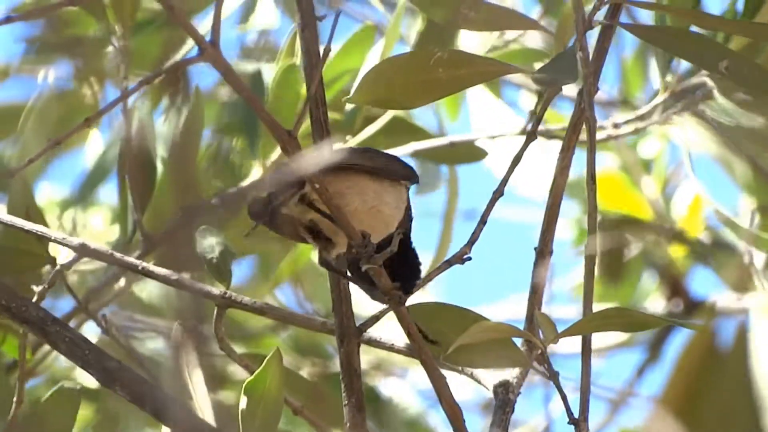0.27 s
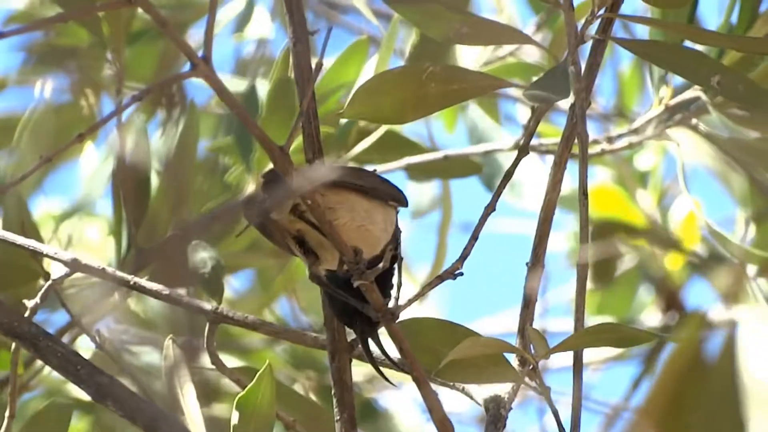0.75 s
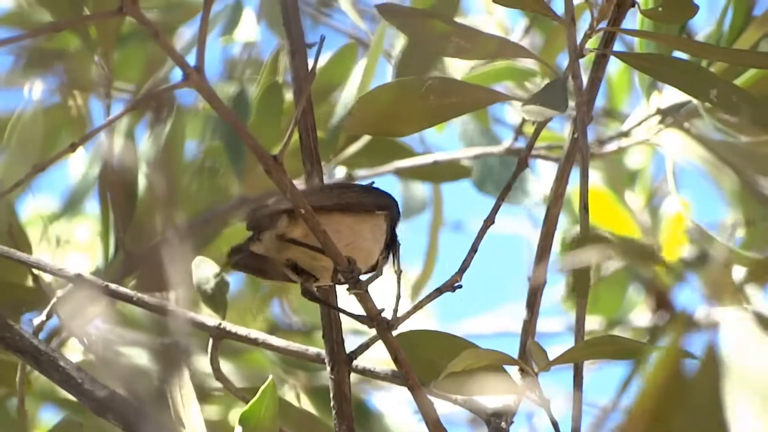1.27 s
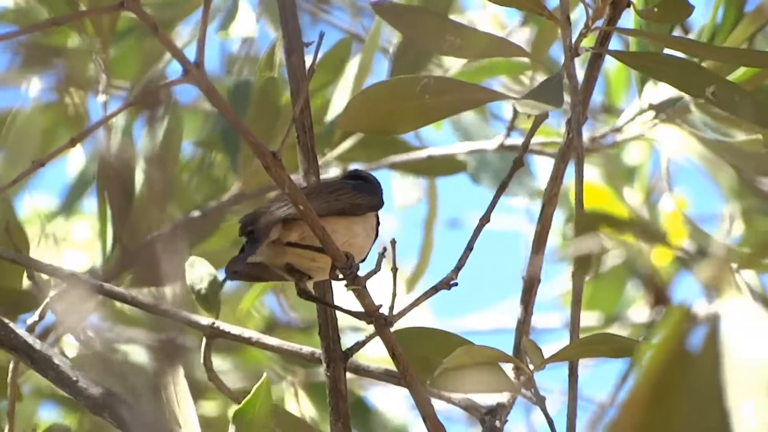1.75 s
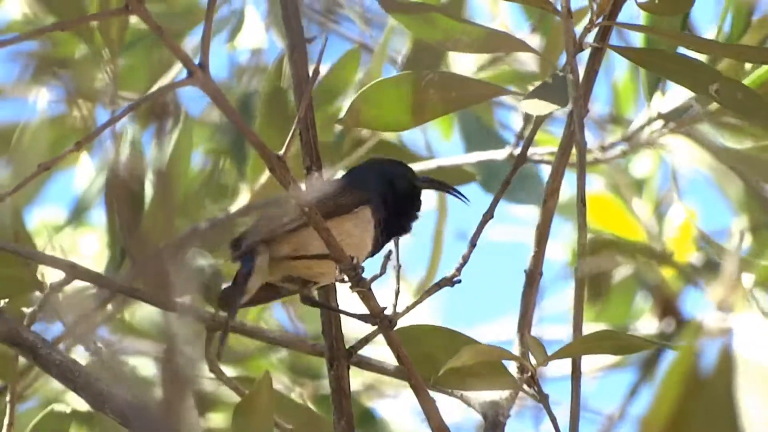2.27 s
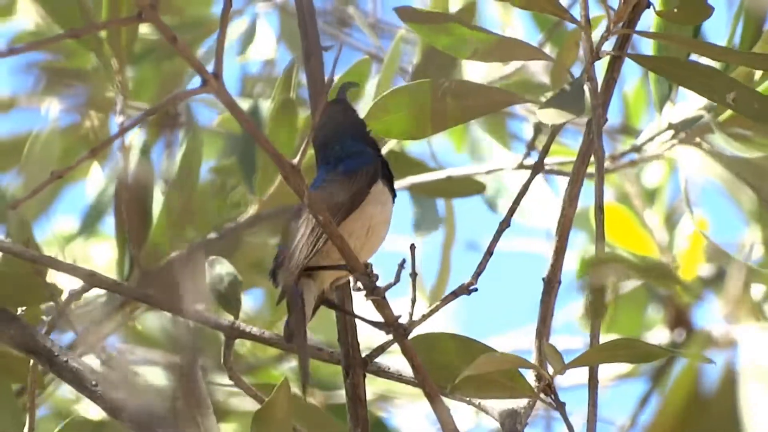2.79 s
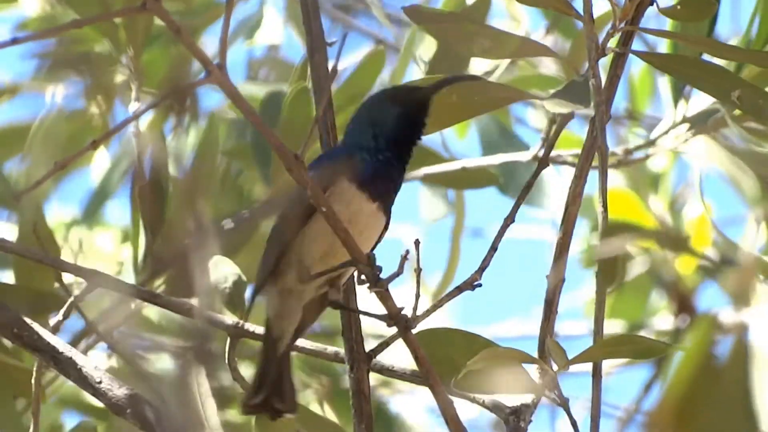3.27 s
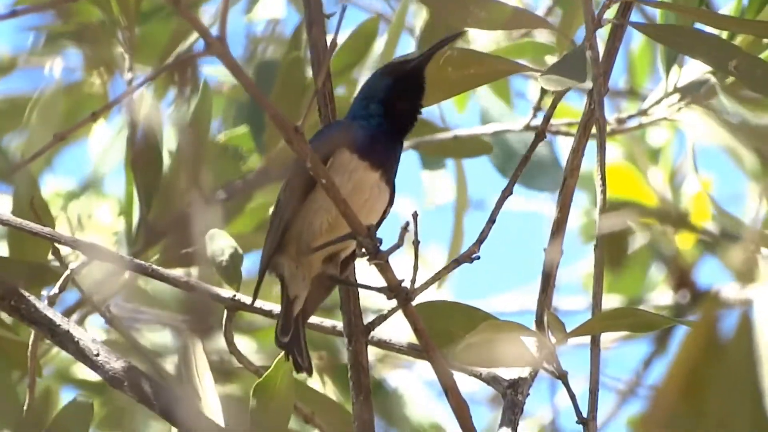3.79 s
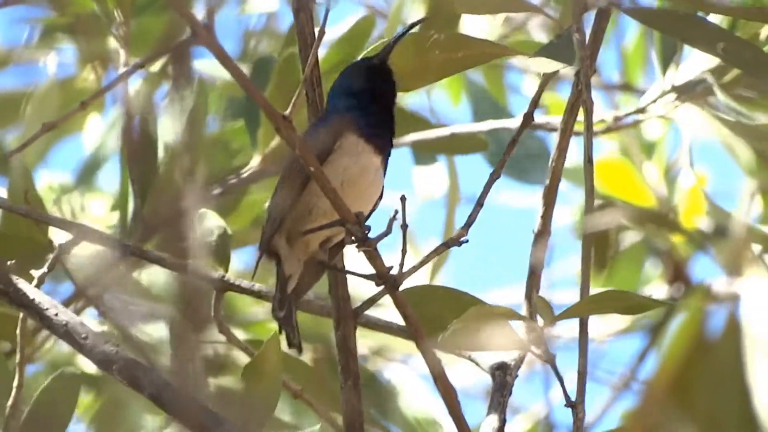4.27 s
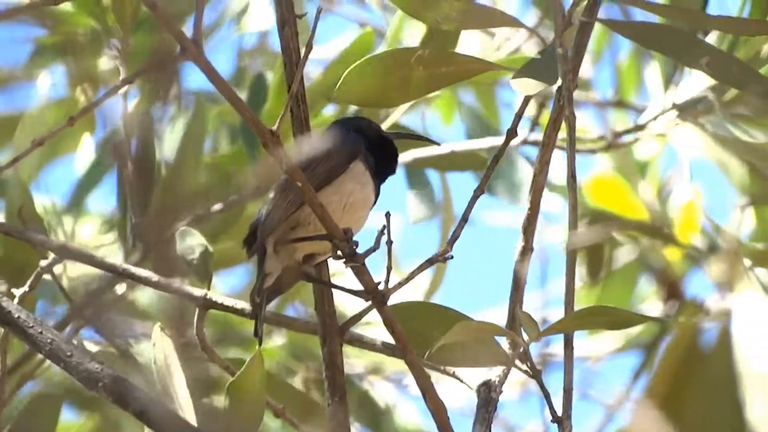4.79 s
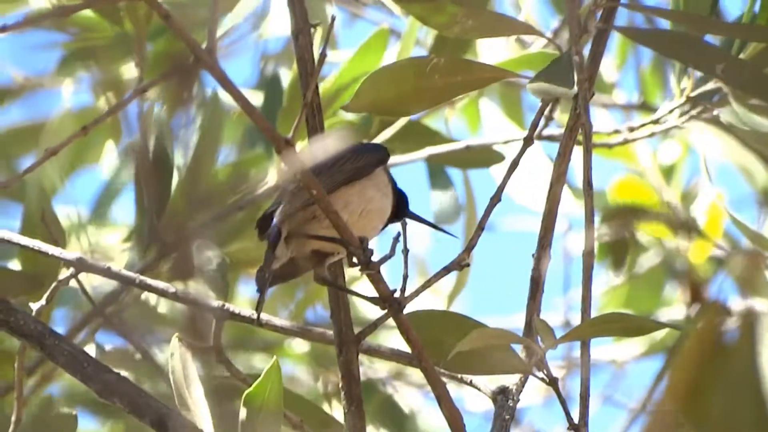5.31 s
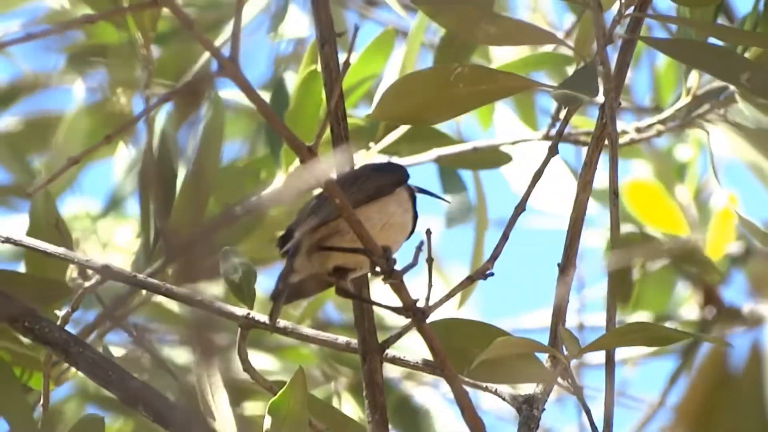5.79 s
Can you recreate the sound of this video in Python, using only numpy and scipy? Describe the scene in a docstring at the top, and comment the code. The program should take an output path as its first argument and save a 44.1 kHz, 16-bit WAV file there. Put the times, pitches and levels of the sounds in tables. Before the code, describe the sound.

Quick, high, scratchy birdsong comes in short bursts outdoors, over a gentle leafy hiss, scattered dry clicks and a faint distant engine hum.

```python
"""A rising wheeze and a scooped tweet open over a soft outdoor rush, then a sunbird twitters on in a leafy tree.
Its syrinx is a pitch-gliding oscillator, roughened for rasp, chopped for buzz, or replaced by noise bands;
foliage adds decaying noise echoes. Dry pips and ticks, short decaying tones with noise clicks, sound close by.
Behind lie shaped noise and a low rumble that swells near 1.4 s and then mixes with the hum of a distant engine,
made of wavering sines."""
import sys
import numpy as np
from scipy import signal
from scipy.fft import rfft, irfft, next_fast_len
from scipy.io import wavfile
from scipy.ndimage import uniform_filter1d, map_coordinates

SR = 44100
rng = np.random.default_rng(int(sys.argv[2]) if len(sys.argv) > 2 else 0)


def dump_mix(stems):
    """Bounce the given channels to the path in sys.argv[1] as a 16-bit WAV at rate SR."""
    frames = np.atleast_2d(stems).T  # one column per channel
    limited = np.clip(frames, -1, 1)  # hard clip at full scale
    pcm = np.round(limited * 32767).astype(np.int16)
    wavfile.write(sys.argv[1], SR, pcm)


N = 266805  # samples
TOP_HZ = 15720  # upper band limit

# Table levels stand before later gains, filters and mixing; spectra are relative, per Hz of bandwidth.
# background air: (time [s], low rush level [dB], rush level [dB], hiss level [dB])
AIR_LEVELS = [(0.0, -60, -51.5, -47), (0.37, -58.5, -47, -53), (1.04, -56.5, -48, -52.5),
              (1.87, -56, -43.5, -49), (2.17, -57.5, -49.5, -52.5), (5.43, -60, -50.5, -56.5),
              (6.05, -61.5, -47.5, -51)]
# spectrum of the low rush: (frequency [Hz], density [dB])
LOW_RUSH_SPECTRUM = [(60, -40), (130, -2), (250, -3.5), (440, 2.5), (800, -6), (1600, -44)]
# spectrum of the main rush: (frequency [Hz], density [dB])
RUSH_SPECTRUM = [(250, -22.5), (600, -3), (1000, 4.5), (1500, 5), (2400, -0.5), (3400, -1.5), (4400, -8),
                 (8800, -46.5), (15500, -56)]
# spectrum of the hiss: (frequency [Hz], density [dB])
HISS_SPECTRUM = [(3000, -16.5), (5000, -5), (8500, -2.5), (10500, -19.5), (15500, -27.5)]
# left-right likeness of the background noise: (frequency [Hz], correlation [0-1])
STEREO_LIKENESS = [(60, .99), (150, 0.82), (500, 0.65), (1200, 0.81), (4000, 0.83), (12000, 0.73)]
# rumble: (time [s], level [dB])
RUMBLE_LEVELS = [(0.0, -68), (0.03, -77), (1.13, -70), (1.43, -46), (1.79, -61.5), (5.54, -61.5),
                 (5.63, -58), (6.05, -55)]
# spectrum of the rumble noise: (frequency [Hz], density [dB])
RUMBLE_SPECTRUM = [(15, -20.5), (30, -3), (60, 0), (95, 2), (135, -11), (250, -25.5), (600, -85)]
# engine lines: (frequency [Hz], level [dB])
ENGINE_LINES = [(47, -1.5), (64, 1.5), (80, -9), (95, -0.5)]

# rising wheezes that lead into a tweet or a chup: (time [s], length [s], middle pitch [Hz], level [dB])
WHEEZES = [(-.01, 0.034, 4570, -31.5), (3.85, 0.015, 4830, -40.5), (4.064, 0.0168, 4600, -43),
           (5.692, .056, 4900, -34), (5.919, 0.047, 4780, -35.5)]
WHEEZE_GLIDE, WHEEZE_RASP, WHEEZE_RICHNESS = 0.48, 0.362, 0.14  # octaves, 0-1, 0-1
WIDE_SPACING_HZ = 2460  # between the partials of wheezes and chups
# low nasal notes with strong harmonics: (time [s], length [s], middle pitch [Hz], level [dB])
NASALS = [(0.78, 0.069, 2115, -37), (0.862, 0.07, 2070, -39.5), (5.062, 0.072, 2048, -40.5),
          (5.363, 0.064, 2018, -42.5)]
NASAL_GLIDE, NASAL_RASP, NASAL_RICHNESS = -0.04, 0.06, 0.2  # octaves, 0-1, 0-1
# buzzes, a strong partial flanked by close weaker ones:
# (time [s], length [s], middle pitch [Hz], glide [octaves], level [dB])
BUZZES = [(2.896, 0.047, 3710, -.04, -36), (2.976, 0.038, 3244, -0.08, -39.5),
          (3.057, 0.02, 3655, 0.074, -31.5), (3.289, 0.04, 4090, 0.11, -39.5),
          (3.353, 0.04, 4360, 0.23, -39.5), (4.311, 0.057, 4340, -0.258, -40.5),
          (4.351, 0.067, 4024, -0.098, -36), (5.604, .07, 3975, 0.198, -40.5)]
BUZZ_SPACING_HZ, BUZZ_RASP, BUZZ_RICHNESS = 791, 0.15, 0.44
# chups, which sag onto one pitch: (time [s], length [s], level [dB])
CHUPS = [(3.864, 0.028, -30.5), (4.07, 0.0333, -32.5)]
CHUP_HZ, CHUP_RASP, CHUP_RICHNESS = (4750, 4290, 4350), 0.089, 0.092  # start, middle, end

# tweets scoop up to a pure held tone:
# (time [s], hold [s], held pitch [Hz], held level [dB], scoop level [dB])
TWEETS = [(.026, 0.028, 4342, -16.5, -30.5), (.222, 0.026, 4253, -27, -27),
          (5.743, .03, 4312, -19.5, -36.5), (5.979, 0.025, 4575, -27.5, -33.5)]
SCOOP_S, SCOOP_LEAD_S = 0.017, 0.012
SCOOP_FROM, SCOOP_MIDDLE = 0.73, 0.89  # pitches as shares of the held tone
SCOOP_RASP, PURE_RASP = 0.16, 0.027
# steep upslurs, a husky climb that breaks into a louder top:
# (time [s], climb length [s], top length [s], top level [dB])
UPSLURS = [(.289, 0.035, 0.026, -23.5), (.404, 0.033, 0.024, -25), (.513, .038, 0.0287, -28)]
CLIMB_HZ, TOP_NOTE_HZ = (3103, 4280, 5170), (5710, 6650, 6990)  # start, middle, end
CLIMB_DB, OVERLAP_S = -2.5, 0.0024  # climb relative to top; overlap of the two
CLIMB_RASP, TOP_RASP = 0.28, 0.16
# slurred and level notes, with two fading echoes of tweets:
# (time [s], length [s], middle pitch [Hz], glide [octaves], level [dB])
SLURS = [(.768, 0.026, 2684, -0.41, -39), (.824, .088, 5160, 0.56, -59), (.932, .04, 4330, .2, -47.5),
         (1.104, .026, 2670, .5, -43.5), (1.212, 0.069, 2420, -0.6, -46),
         (2.097, 0.035, 4070, -0.35, -26.5), (2.71, 0.016, 4266, 0.11, -33),
         (2.722, 0.05, 3035, -0.027, -35), (2.822, .024, 3850, -0.59, -32.5),
         (2.851, .02, 3900, 0.22, -36.5), (2.965, 0.022, 4380, .3, -41), (4.684, 0.055, 2848, .12, -34),
         (4.81, 0.045, 3214, -0.19, -38), (4.991, 0.052, 2980, -0.23, -45), (5.132, .01, 2885, -0.105, -34),
         (5.32, 0.038, 3246, 0.74, -41), (5.476, 0.017, 2236, .9, -38.5), (5.793, 0.02, 4295, 0, -32.5),
         (5.85, 0.029, 3790, -.1, -35.5), (5.951, 0.047, 2860, 0.29, -41), (6.018, .04, 4570, 0, -43)]
EARLY_SHARE = 0.56  # share of a glide done by mid-note
STEADY_RASP, RASP_PER_OCTAVE, MOST_RASP = 0.09, 0.48, 0.21  # sliding roughens the tone
# thin, very high whistles: (time [s], length [s], middle pitch [Hz], level [dB])
THIN_WHISTLES = [(1.392, 0.029, 9230, -37.5), (1.481, 0.07, 9760, -37.5), (1.587, .066, 7620, -29),
                 (1.793, .056, 7450, -37), (1.84, 0.022, 7560, -30.5), (1.891, 0.057, 6604, -35.5)]
THIN_GLIDE, THIN_RASP = 0.076, 0.13  # octaves, 0-1
# lower line sung by the other side of the syrinx: (time [s], length [s], level [dB])
UNDERTONES = [(1.601, 0.093, -46), (1.805, .1, -45)]
UNDER_HZ, UNDER_GLIDE = 6180, 0.23  # middle pitch, octaves

# sharp lisps in the harsh notes: (time [s], length [s], level [dB])
LISPS = [(0.153, 0.031, -47), (.286, 0.026, -48), (2.097, 0.033, -48), (2.444, 0.03, -41),
         (3.858, 0.026, -46), (4.34, 0.092, -52.5), (4.685, 0.048, -53), (5.952, 0.053, -47)]
LISP_HZ, LISP_WIDTH_HZ = 7360, 3500
# toneless rasps, wider the higher they lie: (time [s], length [s], centre [Hz], level [dB])
RASPS = [(0.154, 0.043, 6270, -41), (0.161, .07, 3790, -42), (1.278, 0.034, 2620, -42.5),
         (1.281, 0.028, 6350, -47.5), (2.149, 0.083, 3230, -41.5), (2.204, .032, 1012, -40),
         (2.452, 0.035, 5540, -35.5), (3.084, 0.027, 3200, -41), (3.245, 0.039, 3144, -42.5),
         (3.483, 0.022, 3034, -38.5), (4.691, 0.21, 1786, -48)]
RASP_WIDTH = 0.44  # share of the centre
# turbulence in the bird's throat: (frequency [Hz], density [dB])
HUSK_SPECTRUM = [(600, -18), (1500, -13), (3500, 12), (8500, 8.5), (10500, -31), (15000, -25)]

# close pips: (time [s], peak level [dB], nominal pitch [Hz], decay length [s])
PIPS = [(0.63, -27, 2930, 0.0066), (1.214, -23, 2010, 0.0028), (1.4484, -22, 2980, 0.002),
        (1.7948, -25.5, 3430, 0.0035), (2.031, -27.5, 3780, 0.0036), (2.2972, -25, 3270, 0.0051),
        (2.696, -23, 2750, 0.0027), (3.5216, -20, 2830, 0.0035), (3.551, -31, 2670, 0.0051),
        (3.625, -24, 1780, 0.0053), (3.66, -34, 1760, 0.004), (3.701, -26.5, 3610, 0.0057),
        (3.721, -29, 1950, 0.0056), (4.1505, -27, 3530, 0.0031), (4.2263, -31, 1660, 0.0058),
        (4.524, -26.5, 1520, 0.0045), (4.771, -17, 2225, 0.0064), (4.788, -19, 2940, 0.0065),
        (4.8595, -23.5, 3900, 0.0035), (4.875, -20.5, 3100, 0.0034), (5.136, -28.5, 1930, 0.0064),
        (5.1956, -25, 2190, 0.0035)]
PIP_DB, PIP_SETTLES = -3.5, 0.911  # gain; share of the nominal pitch on which a pip ends
# dry high ticks: (time [s], peak level [dB])
TICKS = [(0.979, -35.5), (1.0957, -29.5), (1.491, -33.5), (2.191, -30), (3.0795, -31), (3.1438, -32.5),
         (3.5854, -36), (4.877, -40), (5.3393, -36)]
TICK_S, TICK_HZ, TICK_DB = 0.00063, 7060, 2.5  # decay length, end pitch, gain
# tone colour of the ticks: (frequency [Hz], gain [dB])
TICK_COLOUR = [(1000, -1.5), (8500, 4.5), (11000, -11), (15500, -14)]
# onsets of quick falling chips: (time [s])
CHIP_TIMES = [1.761, 1.877, 1.989, 2.079]
CHIP_S, CHIP_DB = 0.018, -41


def amp(db):
    """Decibel law: 20 dB is a tenfold amplitude ratio."""
    return 10 ** (np.asarray(db) / 20)


def unit(x):
    """Normalisation of effective amplitude: scale to rms 1."""
    return x / np.sqrt(np.mean(np.abs(x) ** 2) + 1e-20)


def along(points, hz):
    """Logarithmic frequency scale: interpolate (Hz, value) points along it."""
    f, v = np.transpose(points)
    return np.interp(np.log(hz + 1), np.log(f + 1), v)


def curves(rows):
    """Piecewise-linear envelopes: one curve for each column after the time."""
    s, *cols = np.transpose(rows)
    return [np.interp(np.arange(N) / SR, s, c) for c in cols]


def wobble(rate, size=N):
    """Band-limited fluctuation: spline through random knots, rate of them a second."""
    knots = rng.standard_normal(int(size * rate / SR) + 4)
    return map_coordinates(knots, [np.arange(size) * rate / SR])


def filtered(x, response):
    """Linear filtering: multiply the spectrum by a response of frequency."""
    m = next_fast_len(N + SR // 2)
    return irfft(rfft(x, m) * response(np.fft.rfftfreq(m, 1 / SR)), m)[..., :N]


def add(track, s, sound):
    """Superposition: sum a sound into the track at time s."""
    start = round(s * SR)
    part = sound[max(-start, 0):max(N - start, 0)]
    track[max(start, 0):][:len(part)] += part


def rush(spectrum, patchy_db):
    """Random noise with patchy gain; mid and side shares set the interchannel correlation."""
    z = signal.stft(rng.standard_normal((2, N)), nperseg=512)[2]
    field = uniform_filter1d(rng.standard_normal(z.shape[1:]), size=5, axis=0)
    field = uniform_filter1d(field, size=8, axis=1)
    pair = signal.istft(z * amp(patchy_db * unit(field)), nperseg=512)[1][:, :N]

    def mid_side_response(hz):
        angle = np.arccos(np.clip(along(STEREO_LIKENESS, hz), -1, 1)) / 2
        return amp(along(spectrum, hz)) * [np.cos(angle), np.sin(angle)]

    mid, side = filtered(pair, mid_side_response)
    return unit(np.array([mid + side, mid - side]))


def air(low_db=1, rush_db=2, hiss_db=-7.5):
    """Broadband noise by bands: a low body, the main rush and a thin hiss, each with its own level curve."""
    low_level, rush_level, hiss_level = curves(AIR_LEVELS)
    hiss = rush(HISS_SPECTRUM, patchy_db=1.5)
    low_rush = rush(LOW_RUSH_SPECTRUM, patchy_db=1.8)
    main_rush = rush(RUSH_SPECTRUM, patchy_db=2.5)
    return (amp(low_level + low_db) * low_rush
            + amp(rush_level + rush_db + wobble(12)) * main_rush
            + amp(hiss_level + hiss_db) * hiss)


def engine_hum():
    """Line spectrum: steady frequencies whose strengths and phases waver."""
    t = np.arange(N) / SR
    lines = np.zeros(N)
    for hz, db in ENGINE_LINES:
        lines += amp(db + 3.2 * wobble(3.1)) * np.sin(2 * np.pi * hz * t + 0.6 * wobble(2.16))
    return unit(lines)


def rumble(noise_db=-1, hum_db=-2):
    """Power-sharing crossfade: low noise partly gives way to the hum of the far engine."""
    level, = curves(RUMBLE_LEVELS)
    hum_share = np.clip(curves([(1.6, 0), (2.2, 0.63)])[0], 0, 1)  # (time [s], power share)
    roar = rush(RUMBLE_SPECTRUM, patchy_db=1)
    noise_part = amp(noise_db) * np.sqrt(1 - hum_share) * roar
    return amp(level) * (noise_part + amp(hum_db) * np.sqrt(hum_share) * engine_hum())


def swell(length, rise=0.22, fall=0.23):
    """Pressure envelope of one note: rise, hold and rounded fall, as shares of its length."""
    u = np.linspace(0, 1, int(length * SR))
    return u, np.sin(np.pi / 2 * np.clip(np.minimum(u / rise, (1 - u) / fall), 0, 1))


def syrinx(length, start_hz, middle_hz, end_hz, rasp, jitter_hz=900, flutter_rate=1100, shimmer_db=9):
    """Frequency-modulated oscillator: phase and strength of an arched glide; rasp shakes both."""
    u, pressure = swell(length)
    hz = np.polyval(np.polyfit([0, 1 / 2, 1], [start_hz, middle_hz, end_hz], 2), u)
    hz = hz + rasp * jitter_hz * wobble(flutter_rate, len(u))
    shimmer = unit(amp(rasp * shimmer_db * wobble(flutter_rate, len(u))))
    return 2 * np.pi * np.cumsum(hz) / SR, np.sqrt(2) * pressure * shimmer


def glide(hz, octaves):
    """Exponential pitch scale: start, middle and end of a slide that slows as it goes."""
    return hz * 2 ** (-EARLY_SHARE * octaves), hz, hz * 2 ** ((1 - EARLY_SHARE) * octaves)


def chopped_notes():
    """Side partials by modulation: time, length, three pitches, level, rasp, spacing, richness of each note."""
    for s, length, hz, db in WHEEZES:
        yield s, length, *glide(hz, WHEEZE_GLIDE), db, WHEEZE_RASP, WIDE_SPACING_HZ, WHEEZE_RICHNESS
    for s, length, hz, db in NASALS:
        yield s, length, *glide(hz, NASAL_GLIDE), db, NASAL_RASP, hz, NASAL_RICHNESS
    for s, length, hz, octaves, db in BUZZES:
        yield s, length, *glide(hz, octaves), db, BUZZ_RASP, BUZZ_SPACING_HZ, BUZZ_RICHNESS
    for s, length, db in CHUPS:
        yield s, length, *CHUP_HZ, db, CHUP_RASP, WIDE_SPACING_HZ, CHUP_RICHNESS


def chopped_tone(phase, middle_hz, spacing_hz, richness):
    """Amplitude modulation: a slower vibration chops the tone into a central and side partials."""
    r = np.clip(richness, 0, 0.85)  # each further side partial is weaker by this ratio
    # the chopping rate wavers, so the side partials are rougher than the central one
    waver = 2 * np.pi * np.cumsum(55 * wobble(450, len(phase))) / SR
    chop = 1 / (1 + r * r - 2 * r * np.cos(phase * spacing_hz / middle_hz + waver))
    return unit(chop * np.sin(phase)) / np.sqrt(2)


def whistles():
    """Near-sinusoidal oscillation: time, length, three pitches, level, rasp of each plain note."""
    for s, _, hz, _, scoop_db in TWEETS:
        scoop_hz = SCOOP_FROM * hz, SCOOP_MIDDLE * hz, hz
        yield s - SCOOP_LEAD_S, SCOOP_S, *scoop_hz, scoop_db, SCOOP_RASP
    for s, climb, top, db in UPSLURS:
        yield s, climb, *CLIMB_HZ, db + CLIMB_DB, CLIMB_RASP
        yield s + climb - OVERLAP_S, top, *TOP_NOTE_HZ, db, TOP_RASP
    for s, length, hz, octaves, db in SLURS:
        rasp = min(STEADY_RASP + RASP_PER_OCTAVE * abs(octaves), MOST_RASP)
        yield s, length, *glide(hz, octaves), db, rasp
    for s, length, hz, db in THIN_WHISTLES:
        yield s, length, *glide(hz, THIN_GLIDE), db, THIN_RASP
    for s, length, db in UNDERTONES:
        yield s, length, *glide(UNDER_HZ, UNDER_GLIDE), db, THIN_RASP


def tweets(overtone_db=-36):
    """Harmonic superposition: pure held tones, with a weak octave, heard drier than the other notes."""
    out = np.zeros(N)
    for s, hold, hz, db, _ in TWEETS:
        phase, strength = syrinx(hold, hz, hz, hz, PURE_RASP)
        add(out, s, amp(db) * strength * (np.sin(phase) + amp(overtone_db) * np.sin(2 * phase)))
    return out


def toneless_notes():
    """Narrow-band noise: time, length, centre, width, level of each lisp and rasp."""
    for s, length, db in LISPS:
        yield s, length, LISP_HZ, LISP_WIDTH_HZ, db
    for s, length, hz, db in RASPS:
        yield s, length, hz, RASP_WIDTH * hz, db


def toneless_sound(length, centre_hz, width_hz):
    """Random modulation of a carrier: a complex fluctuation spreads one frequency into a band."""
    u, pressure = swell(length, rise=0.16)
    chaos = wobble(width_hz, len(u)) + 1j * wobble(width_hz, len(u))
    return pressure * unit(np.real(chaos * np.exp(2j * np.pi * centre_hz * length * u)))


def song(overtone_db=-30, sheen_db=-29, sheen_hz=4000, husk_db=-9, treble_hz=10500, low_cut_hz=600):
    """Superposition: all notes but the held tweets, thinned in the lows and softened in the high treble."""
    out, turbulence = np.zeros(N), np.zeros(N)
    for s, length, *pitch, db, rasp, spacing_hz, richness in chopped_notes():
        phase, strength = syrinx(length, *pitch, rasp)
        add(out, s, amp(db) * strength * chopped_tone(phase, pitch[1], spacing_hz, richness))
        add(turbulence, s, amp(db) * rasp * strength)
    for s, length, *pitch, db, rasp in whistles():
        phase, strength = syrinx(length, *pitch, rasp)
        overtone = amp(overtone_db) * np.sin(2 * phase)
        # a faint sheen lies a fixed step above each whistle
        sheen = amp(sheen_db) * np.sin(phase + 2 * np.pi * sheen_hz * np.arange(len(phase)) / SR)
        add(out, s, amp(db) * strength * (np.sin(phase) + overtone + sheen))
        add(turbulence, s, amp(db) * rasp * strength)
    for s, length, centre_hz, width_hz, db in toneless_notes():
        add(out, s, amp(db) * toneless_sound(length, centre_hz, width_hz))
    # raspy notes carry a wide skirt of noise
    husk = unit(filtered(rng.standard_normal(N), lambda hz: amp(along(HUSK_SPECTRUM, hz))))
    out += amp(husk_db) * turbulence * husk

    def low_cut_and_treble_roll_off(hz):
        return hz ** 2 / (hz ** 2 + low_cut_hz ** 2) / np.sqrt(1 + (hz / treble_hz) ** 8)

    return filtered(out, low_cut_and_treble_roll_off)


def foliage(x, near_db, far_db, near_t60=0.3, far_t60=0.68, width=0.23):
    """Diffuse scattering: nearby leaves give a quick dense echo, farther trees a longer one."""
    t = np.arange(int(0.7 * SR)) / SR

    def decay(t60):
        return unit(amp(-60 * t / t60) * (1 - np.exp(-t / 0.0016))) / np.sqrt(len(t))

    envelope = np.hypot(amp(near_db) * decay(near_t60), amp(far_db) * decay(far_t60))
    tail = rng.standard_normal((2, len(t))) * envelope
    mid, side = signal.fftconvolve(x[None], tail, axes=1)[:, :N]
    return np.array([mid + width * side, mid - width * side])


def pip(length, start_hz, end_hz, click_db, attack=0.000053, click_t60=0.018):
    """Transient oscillation: a sudden, quickly sliding tone under a Gaussian decay, with a noise click."""
    t = np.arange(SR // 20) / SR
    hz = end_hz + (start_hz - end_hz) * np.exp(-2 * t / length)
    envelope = np.exp(-(t / length) ** 2 * 2) * (1 - np.exp(-t / attack))
    tone = np.sin(2 * np.pi * np.cumsum(hz) / SR) * envelope
    return tone + amp(click_db - 60 * t / click_t60) * rng.standard_normal(len(t)) / 2


def pips(count=150, faint_db=-44, spread_db=4.5, faint_hz=1600, drop=1.206, pip_click_db=-21):
    """Transients of falling pitch, among a random scatter of faint ones that slide either way."""
    out = np.zeros(N)
    for s, db, hz, length in PIPS:
        end_hz = PIP_SETTLES * hz
        add(out, s, amp(db + PIP_DB) * pip(length, drop * end_hz, end_hz, pip_click_db))
    times = rng.uniform(0, N / SR, count)
    for s, (size, pitch, slide, life) in zip(times, rng.standard_normal((count, 4))):
        hz = faint_hz * np.exp(0.42 * pitch)
        faint = pip(0.01 * np.exp(0.5 * life), hz, hz * np.exp(0.208 * slide), click_db=-5.5)
        add(out, s, amp(faint_db + spread_db * size) * faint)
    return out


def ticks(count=45, faint_db=-45, spread_db=4, drop=1.1, click_db=-8):
    """Very brief transients, hence broad spectra: clear high ticks and a random scatter of faint ones."""
    out = np.zeros(N)
    for s, db in TICKS:
        add(out, s, amp(db + TICK_DB) * pip(TICK_S, drop * TICK_HZ, TICK_HZ, click_db))
    times = rng.uniform(0, N / SR, count)
    for s, (size, pitch) in zip(times, rng.standard_normal((count, 2))):
        hz = TICK_HZ * np.exp(0.2 * pitch)
        add(out, s, amp(faint_db + spread_db * size) * pip(TICK_S, drop * hz, hz, click_db))
    return filtered(out, lambda hz: amp(along(TICK_COLOUR, hz)))


def chips():
    """Downward frequency modulation: quick falling chips."""
    out = np.zeros(N)
    for s in CHIP_TIMES:
        phase, strength = syrinx(CHIP_S, start_hz=6260, middle_hz=4430, end_hz=4100, rasp=0.037)
        add(out, s, amp(CHIP_DB) * strength * np.sin(phase))
    return out


def dulled(x, dull_hz=8600):
    """Low-pass filtering: a steep roll-off softens the treble."""
    return filtered(x, lambda hz: 1 / np.sqrt(1 + (hz / dull_hz) ** 12))


def scene():
    """Direct-to-scattered ratio sets distance: bird in the leaves, tweets drier, pips and ticks close."""
    bird, held_tones = song(), tweets()
    close = dulled(pips() + chips()) + ticks()
    singer = amp(-0.5) * bird + foliage(bird, near_db=0.5, far_db=-13)
    singer += held_tones + foliage(held_tones, near_db=-4, far_db=-18)
    return singer + close + foliage(close, near_db=-10, far_db=-8) + air() + rumble()


def record(dry):
    """Band limitation: nothing passes at or above the upper limit."""
    return filtered(dry, lambda hz: hz < TOP_HZ)


dry = scene()
out = record(dry)
dump_mix(out)
```